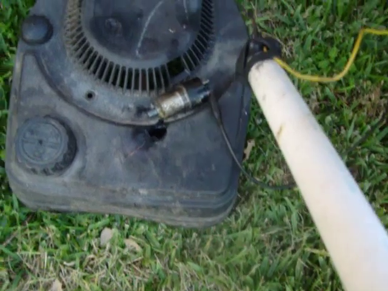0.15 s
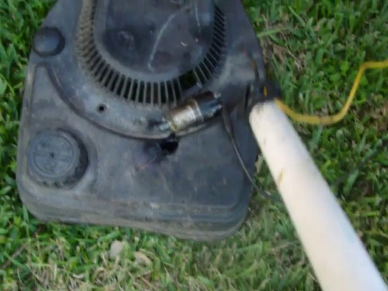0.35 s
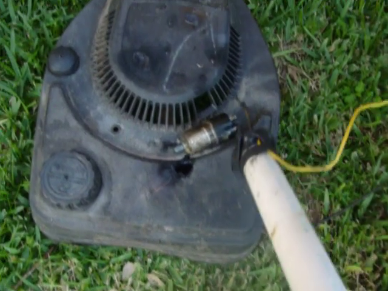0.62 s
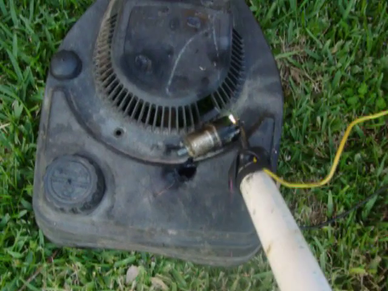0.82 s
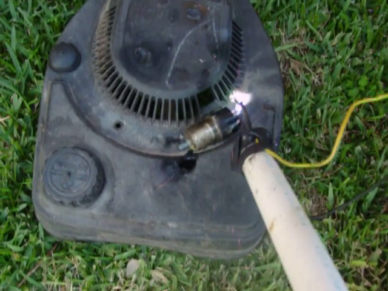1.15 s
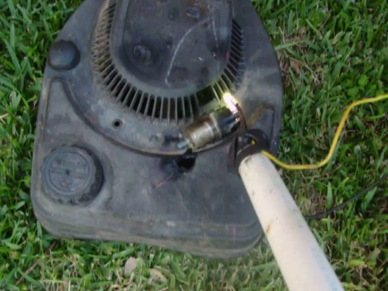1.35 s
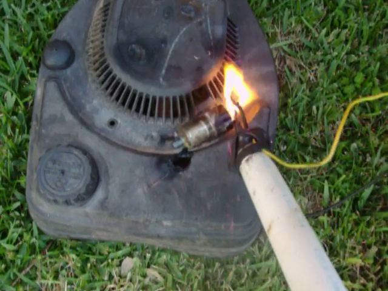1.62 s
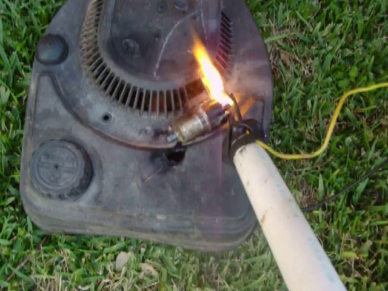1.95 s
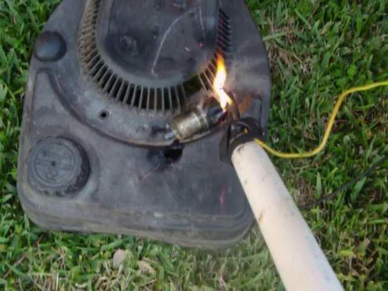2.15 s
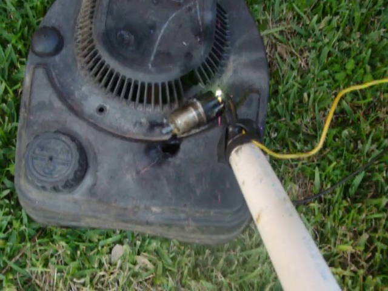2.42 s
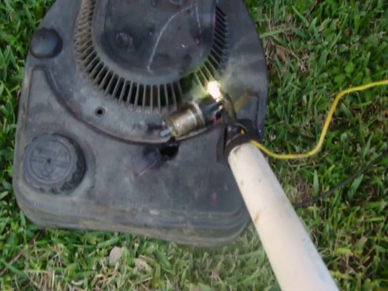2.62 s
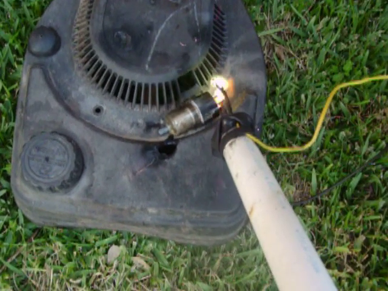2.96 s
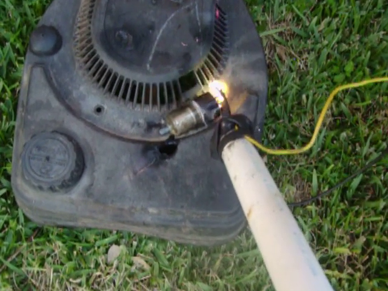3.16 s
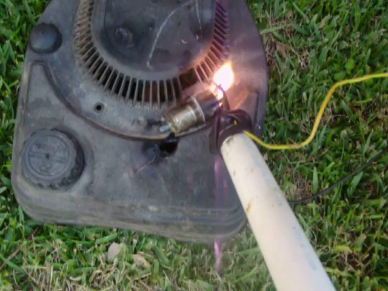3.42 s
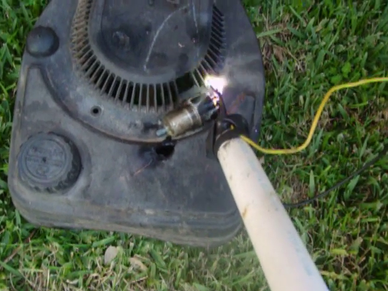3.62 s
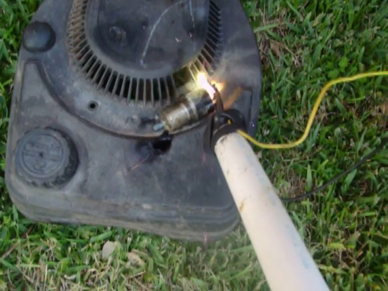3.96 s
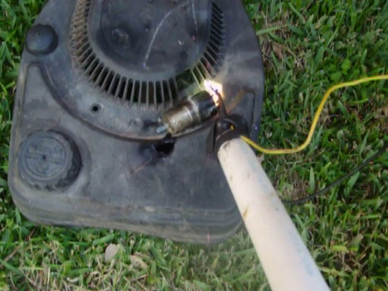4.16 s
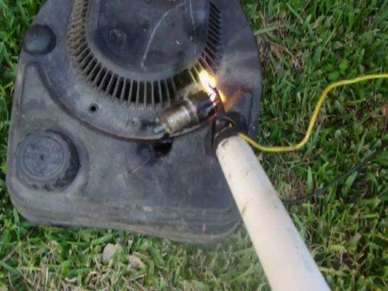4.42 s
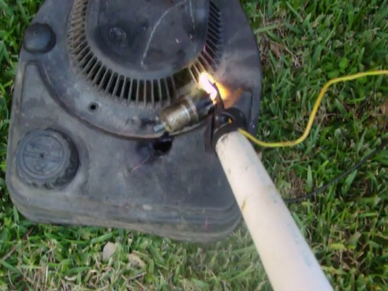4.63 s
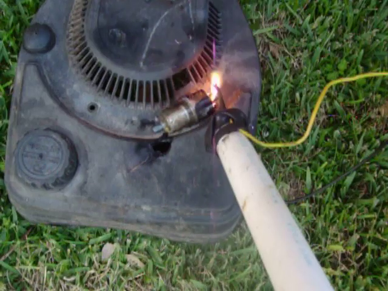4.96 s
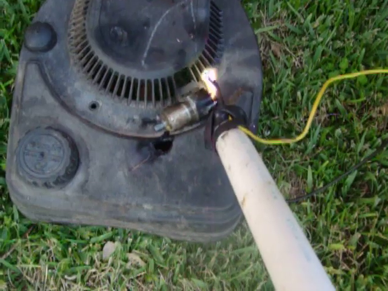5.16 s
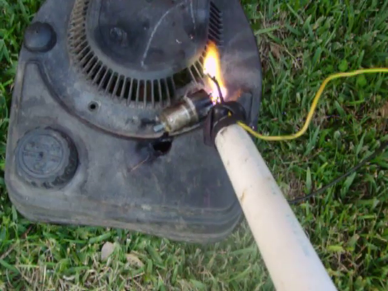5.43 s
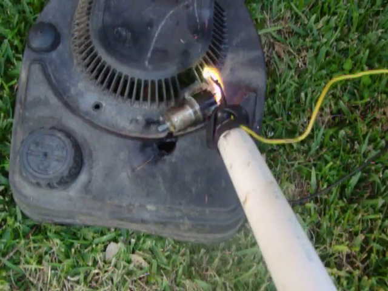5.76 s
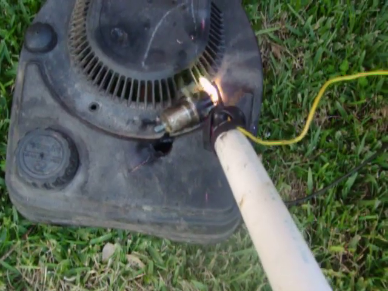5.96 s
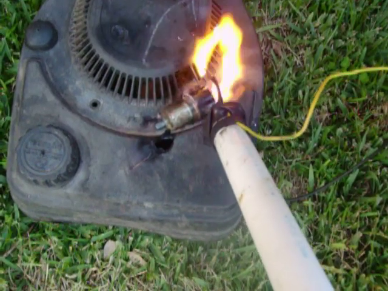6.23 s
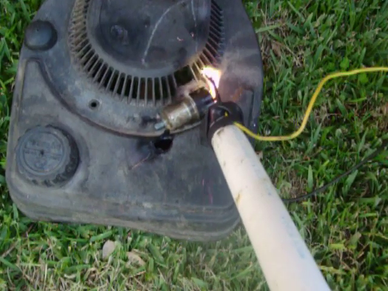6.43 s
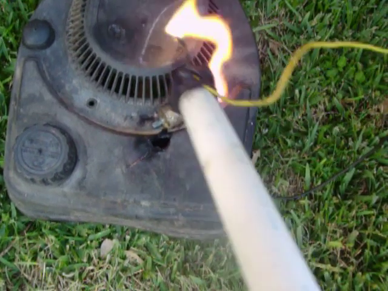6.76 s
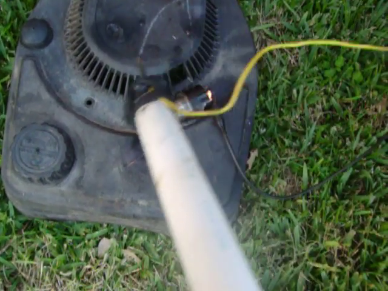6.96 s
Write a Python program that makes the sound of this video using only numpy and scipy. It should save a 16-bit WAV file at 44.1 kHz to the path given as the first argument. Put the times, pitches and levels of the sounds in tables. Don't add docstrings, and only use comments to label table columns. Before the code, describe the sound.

Outdoors over a lawn, motors drone with a wavering low transformer hum and a hollow, booming casing, swelling from 0 to 0.9 s. Near 0.9 s faint sparks tick and the background suddenly drops. At 1.1 s a mains-fed arc catches: a harsh, rasping buzz at about 120 strikes per second, each a dry crack plus a hollow thump ringing the housing. It flares unevenly, with heavy knocks around 1.6-2.3 s, weaker sputtering and soft gas swishes near 2.4-2.8 s, and brighter cracks to 3.6 s. From 3.9 to 5 s it is fuller, humming and densely crackling. Afterwards it tears and throbs, surging around 5.4, 6.2 and 6.3 s, with a tiny falling whistle at 6.54 s. It weakens and cuts out at 6.9 s; rumbling drone returns briefly. The close microphone clips, sounds muffled on top, and pumps.

```python
import sys
import numpy as np
from scipy import signal
from scipy.fft import rfft, irfft
from scipy.io import wavfile
from scipy.ndimage import uniform_filter1d, map_coordinates

SR = 44100
rng = np.random.default_rng(int(sys.argv[2]) if len(sys.argv) > 2 else 0)


def gain_from_db(level_db):
    decades = np.asarray(level_db, float) / 20
    return 10 ** decades


def master_out(mix):
    frames = np.transpose(np.atleast_2d(mix))
    ceiling = np.clip(frames, -1, 1)
    pcm = np.round(ceiling * 32767).astype(np.int16)
    wavfile.write(sys.argv[1], SR, pcm)


N = 312228
T = np.arange(N) / SR
COARSE = T[::32]

STRIKES_HZ, FIRST_STRIKE_S = 120.016, .0010
THUMP_MS, SHORT_CRACK_MS, LONG_CRACK_MS, SWITCH_S = .7, -1.55, .15, .04
LAG_MS_PER_DB, EARLY_SHARE = .03, .13
LIT_S, OUT_S = 1.132, 6.91
# centre_s, half_width_s, delay_ms
TUGS = [
    (1.87, .05, -1),
    (2.0, .1, 1.1),
    (3.98, .08, .5),
    (5.37, .06, .7),
    (5.54, .07, .8),
    (6.27, .08, .8),
    (6.53, .1, -.6),
    (6.65, .08, 1.2),
    (6.9, .14, 1.5),
]
# start_s, end_s
LONG_SPANS = [
    (1.88, 2.11),
    (2.24, 2.29),
    (3.47, 3.56),
    (3.87, 5.03),
    (5.24, 5.28),
    (5.35, 7.0),
]

# time_s, restrike_db, current_db
ARC = [(1.1, -31, -24.5), (1.4, -32, -24.5), (1.68, -31.5, -24), (2.0, -34, -27.5), (2.3, -34, -29),
       (2.47, -38, -28.5), (2.6, -32.5, -31.5), (3.0, -35, -37.5), (3.4, -30.5, -29), (3.8, -35.5, -35.5),
       (4.15, -28, -23.5), (4.4, -29.5, -26), (5.0, -29, -33), (5.2, -33.5, -43.5), (5.45, -29.5, -27.5),
       (5.9, -37, -37), (6.5, -29, -33), (6.7, -44.5, -31), (6.9, -43.5, -21)]
# peak_s, rise_s, fall_s, thump_db, brightness_db
SHORT_FLARES = [(1.17, 0.06, 0.051, -22.5, 7), (1.268, 0.02, 0.0041, -15, -19),
                (1.35, 0.029, 0.038, -17.5, -25), (1.47, 0.066, 0.16, -19, -19.5),
                (1.598, 0.12, 0.052, -26.5, -2.5), (1.674, 0.078, 0.016, -7, -22),
                (1.759, 0.036, 0.098, -22, -1.5), (2.342, 0.013, 0.007, -16, -5),
                (2.581, 0.089, 0.087, -29, -6.5), (2.729, 0.18, 0.0163, -24.5, 2.5),
                (2.878, 0.11, 0.013, -17, -9), (2.94, 0.054, 0.019, -17.5, -5.5),
                (3.05, 0.087, 0.022, -15, -18), (3.103, 0.017, 0.042, -21.5, 12),
                (3.181, 0.052, 0.031, -16.5, -10), (3.403, 0.13, 0.037, -11, -3),
                (3.49, 0.024, 0.15, -26, 13), (3.632, 0.053, 0.11, -18, -7), (3.77, 0.029, 0.03, -23.5, -8),
                (5.2, 0.13, 0.1, -17, -11), (5.345, 0.088, 0.04, -12.5, -1.5),
                (5.641, 0.095, 0.022, -24, -7), (5.73, 0.049, 0.087, -35.5, 18.5),
                (5.849, 0.081, 0.08, -18, -2.5)]
# peak_s, rise_s, fall_s, thump_db, brightness_db
LONG_FLARES = [(1.981, 0.047, 0.021, -16, 0.5), (2.089, 0.045, 0.039, -22.5, 13),
               (2.252, 0.073, 0.013, -9, -0.5), (3.879, 0.057, 0.08, -19.5, 7.5),
               (4.1, 0.38, 0.081, -22, -10), (4.23, 0.14, 0.039, -22, 9), (4.333, 0.039, 0.026, -21, -3.5),
               (4.408, 0.084, 0.031, -17.5, 5), (4.488, 0.025, 0.069, -17, 4),
               (4.602, 0.26, 0.12, -24.5, 2), (4.818, 0.11, 0.024, -18, 3), (4.901, 0.04, 0.009, -18, -3.5),
               (4.989, 0.025, 0.044, -27.5, 16.5), (5.42, 0.1, 0.028, -27.5, 17),
               (5.497, 0.036, 0.032, -25, 0), (5.562, 0.05, 0.015, -33, -8), (5.98, 0.11, 0.043, -28.5, 16),
               (6.109, 0.034, 0.076, -22, 11.5), (6.226, 0.022, 0.013, -13, 5),
               (6.31, 0.036, 0.014, -27, -11), (6.44, 0.073, 0.12, -30.5, 14),
               (6.522, 0.019, 0.012, -23, -1), (6.639, 0.088, 0.064, -21.5, 1.5),
               (6.85, 0.18, 0.061, -22, -15)]
EMBER_DB, EMBER_BRIGHT_DB = -37, 7.5
SLOPE_DB = 10
MID_DB, SIZZLE_SHARE, HUM_SHARE = -21, 0.22, 0.19
CUT_SHARE = 0.6
# centre_s, half_width_s, depth_db
LULLS = [(1.21, 0.02, 16), (1.43, 0.02, 14), (1.87, 0.043, 3), (2.43, 0.046, 4), (2.63, 0.016, 8),
         (2.78, 0.014, 13), (2.93, 0.025, 4), (3.08, 0.016, 4), (3.6, 0.048, 11), (3.83, 0.047, -4),
         (3.96, 0.064, 7.5), (4.76, 0.072, 12), (4.88, 0.017, 19), (5.511, 0.068, 19), (5.17, 0.057, 7),
         (5.61, 0.061, 6), (6.05, 0.026, -1), (6.29, 0.062, 6), (6.57, 0.022, 6)]

# mode_hz, width_hz, level_db
DULL_MODES = [
    (250, 52, -10),
    (618, 61, 0.5),
    (713, 140, 8.5),
]
# mode_hz, width_hz, level_db
BRIGHT_MODES = [
    (936, 120, 5),
    (1090, 160, 2.5),
    (1359, 49, 5),
    (1490, 110, -3),
]
DRIFT = .035
# delay_s, level_db
ECHOES = [
    (.002, -18.5),
    (.00335, -13),
    (.0063, -18),
]
DIRECT_DB = -9
# time_s, pitch_hz, level_db
POCKET = [(1.1, 645, -4), (1.13, 768, 0.5), (1.7, 666, -9), (1.73, 832, 2), (2.16, 714, -4),
          (3.46, 690, -6.5), (3.53, 823, -7.5), (3.62, 676, -1), (4.99, 780, -4), (5.2, 665, -7),
          (5.48, 866, -2.5), (5.53, 727, -1), (5.99, 713, -4.5), (6.02, 842, -5.5), (6.3, 713, -1.5),
          (6.52, 850, -1), (6.87, 642, -4), (6.95, 800, -2)]
POCKET_WIDTH_HZ = 140
# time_s, peak_db
BLOWS = [(1.583, -4), (1.667, -12), (1.676, -9), (1.741, -5), (1.941, -7), (1.958, -1), (2.05, -2.5),
         (2.092, -3), (2.133, -3), (2.2, -5.5), (2.251, -13), (2.259, -7), (2.309, -6.5), (2.867, -13),
         (3.385, -4.5), (3.393, -16), (3.401, -13), (3.592, -8), (4.216, -4), (4.308, 2), (4.317, 0.5),
         (4.358, 2), (4.417, 0), (4.466, 0), (4.493, -3), (4.583, -13), (4.849, -1), (4.858, -0.5),
         (4.975, -2), (5.049, -10), (5.333, -17), (5.342, -8), (5.351, -3), (5.567, -9), (5.601, -11.5),
         (5.684, -5.5), (5.774, -13), (6.074, -24), (6.166, -8.5), (6.192, 1.5), (6.2, -4), (6.225, -16),
         (6.275, -9), (6.308, -7), (6.341, -10), (6.626, -8), (6.643, -13), (6.676, -11), (6.751, -10),
         (6.768, -11), (6.826, -10)]

# frequency_hz, density_db (per Hz)
SNAP_COLOUR = [(300, -9), (1200, -2), (1900, -7), (2500, -2.5), (3300, 4), (4000, -3.5), (5300, -4.5),
               (6400, -13.5)]
# delay_s, level_db
SNAP_ECHOES = [
    (.00043, -13),
    (.0009, -9),
    (.00195, -11),
    (.0028, -16),
    (.0036, -17),
    (.0063, -20),
]
CRACK_EDGE, CRACK_T60_S = 13, .009
USUAL_TILT_DB, SPLIT_HZ = -5, 3900
# time_s, peak_db
TICKS = [
    (.899, -25),
    (.907, -23),
    (.9155, -26),
    (2.2597, -8),
    (4.8591, -8),
    (5.4255, -2),
    (6.2005, -2),
]
# time_s, peak_db, treble_over_mid_db
LOUD_CRACKS = [(1.1657, -10, 3), (1.1744, -14, -2), (1.2326, -19, -8), (1.2834, -11, -7.5),
               (1.3084, -7, -1.0), (1.4577, -7, 4), (1.5409, -14, 18), (1.5662, -9.5, 3),
               (1.6326, -21, 1), (1.6574, -8, 1), (1.6679, -10, -11), (1.674, -7, -4), (1.6846, -4.5, -5),
               (1.6916, -17, -3), (1.7661, -19, -9.5), (1.8417, -5, 0), (1.9433, -12, -5),
               (1.9674, -9, -4), (1.9764, -10, -7), (2.0277, -12, -6), (2.1008, -7, -16),
               (2.1086, -9, -20), (2.1174, -12, -19), (2.1589, -13, -8), (2.2597, -17, -9),
               (2.2837, -9, -17), (2.3153, -11, -7.0), (2.3494, -6, -6), (2.624, -18, -12),
               (2.6575, -14, 11), (2.6907, -12, 19), (2.7074, -11, 16), (2.7992, -22, 3),
               (2.8077, -7.5, 11), (2.8241, -14, 13), (2.883, -13, 7), (2.9496, -10, -11),
               (3.0076, -8.5, 10), (3.0494, -14, -6), (3.0576, -8, -2), (3.0661, -10, -2),
               (3.1094, -7, -7), (3.1741, -8, 14), (3.1909, -11, 13), (3.2171, -5, -5), (3.3075, -3, 11),
               (3.3159, -1.5, -1), (3.366, -5.5, 9), (3.3995, -30, -2), (3.4078, -9, -6),
               (3.4162, -25, -12), (3.4489, -15, 2), (3.5256, -12.5, -22), (3.542, -11.5, -17),
               (3.5487, -18, -6), (3.5822, -8.5, -7),
               (3.7071, -8.5, -14), (3.7239, -21, -8), (3.776, -13, 0), (3.8753, -5, 1), (3.9084, -5, -3),
               (3.9254, -6, -3), (4.009, -6.5, 3), (4.0248, -9, -7), (4.059, -7, -12), (4.0758, -13, -14),
               (4.109, -13, -6), (4.117, -12, 6), (4.143, -8, -5), (4.1501, -9, 6), (4.1752, -18, 2),
               (4.1906, -16, -3), (4.2, -8, 2), (4.2087, -15, 0), (4.242, -5, -11), (4.25, -7, -9),
               (4.2587, -19, -16), (4.3079, -7, -16), (4.342, -7, -11), (4.374, -7, -5), (4.4153, -11, -14),
               (4.4256, -7, -9.5), (4.432, -7, 5), (4.4654, -6, -9), (4.483, -11, 1.0), (4.4997, -10, -2.0),
               (4.534, -15, -9), (4.55, -13, 2), (4.5758, -21, -3), (4.5923, -23, -15), (4.6173, -14, -2.0),
               (4.626, -17, 7), (4.6336, -4, -1), (4.641, -16, -6.0), (4.667, -10, 3), (4.685, -13, -1.5),
               (4.6915, -7.5, -5), (4.7343, -6, -5.0), (4.741, -9, -5), (4.7922, -4, 0), (4.8, -5, -5),
               (4.808, -5, -2), (4.86, -12, -17.5), (4.8659, -9, -7), (4.901, -17, -25), (4.925, -13, -22),
               (4.9423, -8, -18), (4.9577, -12, -21), (4.992, -10, -21), (5.0005, -9, -15),
               (5.0491, -7, -2), (5.057, -10, -8),
               (5.1238, -11, -9), (5.1422, -11, -16), (5.1893, -15, -9), (5.2337, -14, -20),
               (5.2746, -19, -5), (5.3317, -20, -7.0), (5.3588, -3, -8.0), (5.3667, -11, 4),
               (5.3843, -10, 0), (5.3926, -15, -3), (5.4095, -16, -7), (5.4259, -4, -5), (5.443, -7, -5),
               (5.459, -3, -10), (5.4663, -7, -10), (5.4741, -3, -3), (5.541, -12, 1), (5.5765, -4.5, -4),
               (5.6416, -8.5, -5), (5.684, -9.5, -15), (5.715, -20, -12), (5.725, -15, -14),
               (5.767, -12.5, -13), (5.7744, -6, -10), (5.8168, -11, -2), (5.8249, -7, -9),
               (5.86, -9.5, -13), (5.875, -6, -10), (5.885, -8, 0), (5.8928, -5.5, -9), (5.909, -6, -6),
               (5.917, -5, -3), (5.9246, -14, 3), (5.96, -6, -1), (5.9662, -5, -11), (5.976, -10, -17),
               (5.992, -5, -9), (6.0338, -11, -11), (6.041, -8.5, -14), (6.0658, -7, -9.5),
               (6.0753, -5.5, -4), (6.116, -21, -1), (6.1424, -10, -14), (6.1588, -3, -7),
               (6.2004, -14, -6), (6.2345, -9, -15), (6.243, -10, -18), (6.317, -6.5, -3),
               (6.3493, -20.4, 5), (6.4502, -11, -18), (6.5003, -4.5, -7), (6.5173, -8, -9),
               (6.526, -7, -10), (6.539, -8, -4), (6.5917, -12.5, 0), (6.7093, -7.5, 1)]

# multiple (of the strike rate), level_db
HUM = [
    (1, -27),
    (2, 4.5),
    (3, -13.5),
]
# tear_s, rise_s, fall_s, throb_db, hum_db
THROB = [
    (6.316, 0.096, 0.0016, -21.5, -24.5),
    (6.705, 0.06, 0.0074, -25, -29),
    (6.87, 0.06, .03, -28, -33),
]
# peak_s, rise_s, fall_s, level_db
SWISH = [
    (2.6, 0.11, 0.04, -35.5),
    (2.72, 0.061, .08, -36),
]
CHIRP_S, CHIRP_HZ, CHIRP_FALL_HZ_PER_S, CHIRP_DB = 6.538, 2280, 30000, -31

# frequency_hz, density_db (per Hz)
ROAR = [(18, -48.5), (30, -27), (49, -39), (80, -15.5), (107, -9.5), (171, -5.5), (195, -7.5), (239, 5),
        (319, -7.5), (570, 0), (833, 0.5), (911, 0.5), (1820, -18.5), (5070, -25.5), (6200, -47.5),
        (8060, -74.5), (13600, -120)]
# mode_hz, width_hz, level_db
ROAR_PEAKS = [
    (272, 30, -17.5),
    (598, 81, 2),
    (883, 46, -2),
    (1384, 44, -7),
]
# turns_per_s, then rows of multiple, level_db
MOTORS = [
    (55.6, [(1, -9), (2, -2), (3, -5), (5, -6), (7, -11), (9, -7)]),
    (59.15, [(11, -5), (12, -10), (13, -6), (15, -7), (16, -6), (18, -12), (21, -8), (23, -13), (24, -13), (27, -15)]),
]
SAG_DB, ROAR_SAG_DB = -10, -3
# time_s, level_db
TRANSFORMER = [
    (0, -4),
    (.15, 11),
    (.3, 0.5),
    (.47, 5),
    (.6, -2.5),
    (.72, 7),
    (.87, -4.5),
    (1.0, -1),
    (7.08, -23),
]
TRANSFORMER_HZ = 240.0
# start_s, end_s, over_drone_db
IDLE = [
    (-.1, 0.88, 3),
    (0.875, 1.15, 7),
    (2.413, 2.653, 4.5),
    (6.915, 7.2, 4.5),
]
IDLE_HZ, IDLE_WIDTH_HZ, IDLE_EDGE_S = 304, 400, 0.038
BOOM_HZ, BOOM_WIDTH_HZ, BOOM_DB = 265, 35, -3

# time_s, cut_db, drone_db (climbed back to), recovery_s, fizz_db
CUTS = [(0, 15.5, -21.5, 0.44, -79), (0.877, 18.5, -28, 0.34, -21.5), (1.285, 15, -25, 0.56, -34),
        (1.691, 11, -29, 0.051, -24), (1.847, 14.5, -27, 0.13, -29), (2.286, 3.5, -32.5, 0.13, -51),
        (2.645, 4, -36, 0.028, -55), (2.883, 6, -32.5, 0.089, -34), (3.113, 11.5, -27.5, 0.097, -68.5),
        (3.418, 21.5, -32, 0.033, -27), (3.781, 13, -26.5, 0.27, -66), (4.497, 22.5, -30, 0.031, -30),
        (5.062, 9, -29.5, 0.13, -63), (5.581, 18, -31.5, 0.077, -34), (6.32, 14, -30, 0.13, -30),
        (6.54, 15, -28, 0.16, -24), (6.715, 12, -32, 0.13, -34), (6.901, 11.5, -30, 0.2, -78)]
SQUASH = .85
LIMIT, OFFSET, EDGE_HZ = .715, -.0033, 5720


def thump(level_db, bright_db):
    lag_s = LAG_MS_PER_DB * (level_db - MID_DB) / 1000
    clicks = strikes(column=1, jitter_s=.00007, spread_db=1.7, lag_s=lag_s)
    s, hz, db = np.transpose(POCKET)
    pocket_ring = ring(clicks, [(0.99, POCKET_WIDTH_HZ, 19)], np.interp(T, s, hz))
    pocket = gain_from_db(np.interp(T, s, db)) * evened(pocket_ring)
    dull = evened(ring(clicks, DULL_MODES, 1 + DRIFT * wander(7.7)))
    bright = evened(ring(clicks, BRIGHT_MODES, 1 + DRIFT * wander(17)))
    return gain_from_db(level_db - 4.0) * (dull + pocket + gain_from_db(bright_db - 4.0) * bright)


def blows():
    clicks = events([(moment(s + .0012, column=1) + 0.00036, db) for s, db in BLOWS], -12.0)
    return ring(clicks, DULL_MODES) + gain_from_db(9.5) * ring(clicks, BRIGHT_MODES)


def sizzle(level_db):
    clicks = gain_from_db(level_db - 0.5) * strikes(column=2, jitter_s=.00008, spread_db=1.54, early=EARLY_SHARE)
    rough = snaps(clicks, edge=CRACK_EDGE, t60=CRACK_T60_S)
    half_cycle = ((T + .003) * STRIKES_HZ).astype(int)
    sharp_db = 3.5 * np.clip(rng.standard_normal(half_cycle[-1] + 1), -2, 2)
    sharp = uniform_filter1d(gain_from_db(sharp_db)[half_cycle], 40)
    treble = signal.oaconvolve(rough, signal.firwin(31, SPLIT_HZ, pass_zero=False, fs=SR), "same")
    return (rough + (sharp - 1) * treble) * gain_from_db(2.0)


def cracks():
    rows = LOUD_CRACKS
    out = snaps(events(TICKS, -14.0), edge=8, t60=.008)
    for side in (-1, 1):
        tilted = [(s, db + side * (tilt_db - USUAL_TILT_DB) / 2) for s, db, tilt_db in rows]
        half = signal.firwin(31, SPLIT_HZ, pass_zero=side < 0, fs=SR)
        spikes = snaps(events(tilted, -18.5), edge=CRACK_EDGE, t60=CRACK_T60_S)
        out += signal.oaconvolve(spikes, half, "same")
    fizz = events([(row[0] - .003, row[-1]) for row in CUTS[1:]], 2.2)
    return out + snaps(fizz, edge=0, t60=0.033)


def hum(level_db):
    late_s = np.interp(T, COARSE, delay(COARSE, column=1))
    angle = 2 * np.pi * STRIKES_HZ * (T - late_s + THUMP_MS / 1000)
    orders = sum(gain_from_db(db) * np.cos(k * angle + phase) for (k, db), phase in zip(HUM, (2.4, .9, .9)))
    throb_db, swell_db = swells(THROB)
    return (gain_from_db(level_db - 1.5) + gain_from_db(swell_db)) * orders + gain_from_db(throb_db - 3.0) * np.cos(angle + 1.8)


def flame(level_db):
    return gain_from_db(level_db - 28.5) * evened(resonate(rng.standard_normal(N), 120, 70))


def hiss():
    gas = evened(signal.oaconvolve(rng.standard_normal(N), colour(SNAP_COLOUR), "same"))
    t = np.clip(T - CHIRP_S, 0, .018)
    envelope = np.sin(np.pi * (t / .018) ** .5)
    whistle = np.sin(2 * np.pi * (CHIRP_HZ - CHIRP_FALL_HZ_PER_S * t / 2) * t) * envelope
    return gain_from_db(swells(SWISH)[0]) * gas + gain_from_db(CHIRP_DB) * whistle


def flares():
    rows = [(s, rise, fall, db, db + bright_db)
            for s, rise, fall, db, bright_db in SHORT_FLARES + LONG_FLARES]
    low_db, high_db = swells(rows)
    low = np.hypot(gain_from_db(low_db), gain_from_db(EMBER_DB))
    high = np.hypot(gain_from_db(high_db), gain_from_db(EMBER_DB + EMBER_BRIGHT_DB))
    return 20 * np.log10(low), 20 * np.log10(high / low)


def strikes(column, jitter_s, spread_db, lag_s=0, early=0):
    count = int(N / SR * STRIKES_HZ) - 2
    late, size = rng.standard_normal((count, 2)).T
    zero = FIRST_STRIKE_S + np.arange(1, count + 1) / STRIKES_HZ
    at = np.where(rng.random(count) < early, zero + SHORT_CRACK_MS / 1000, moment(zero, column))
    at += jitter_s * late + np.interp(zero, T, lag_s + 0 * T)
    return np.bincount((at * SR).astype(int), gain_from_db(spread_db * np.clip(size, -2, 2)), N)


def moment(s, column):
    zero = FIRST_STRIKE_S + np.round((s - FIRST_STRIKE_S) * STRIKES_HZ) / STRIKES_HZ
    return zero + delay(zero, column)


def delay(s, column):
    long = sum(np.clip(np.minimum(s - a, b - s) / SWITCH_S + .5, 0, 1) for a, b in LONG_SPANS)
    crack_ms = SHORT_CRACK_MS + (LONG_CRACK_MS - SHORT_CRACK_MS) * long
    return (bumps(TUGS, s) + (THUMP_MS if column == 1 else crack_ms)) / 1000


def events(rows, db):
    s, peak_db = np.transpose(rows)
    return np.bincount((s * SR).astype(int), gain_from_db(peak_db + db), N)


def ring(clicks, modes, shift=1):
    push = signal.oaconvolve(clicks, signal.windows.hann(round(.0009 * SR)))[round(.0004 * SR):][:N]
    pulses = -signal.lfilter(*signal.butter(1, 150, "high", fs=SR), push)
    rung = sum(gain_from_db(db) * resonate(pulses, f * shift, w) for f, w, db in modes)
    return echoed(gain_from_db(DIRECT_DB) * pulses + rung, ECHOES)


def snaps(clicks, edge, t60):
    sparks = signal.oaconvolve(clicks, gain_from_db(-60 * T[:3000] / t60))[:N] * rng.standard_normal(N)
    return echoed(signal.oaconvolve(sparks - edge * clicks, colour(SNAP_COLOUR), "same"), SNAP_ECHOES)


def echoed(x, echoes):
    out = x.copy()
    for s, db in echoes:
        lag = round(s * SR)
        out[lag:] += gain_from_db(db) * x[:N - lag]
    return out


def resonate(x, hz, width):
    turn = np.exp(2j * np.pi * np.cumsum(hz + 0 * x) / SR)
    r = np.exp(-np.pi * width / SR)
    return 2 * (turn * signal.lfilter([1 - r], [1, -r], x / turn)).real


def colour(points):
    gain = gain_at(points, np.fft.rfftfreq(1024, 1 / SR))
    cepstrum = irfft(np.log(np.maximum(gain, gain_from_db(-32))))
    folded = cepstrum * np.r_[1, 2 * np.ones(511), 1, np.zeros(511)]
    spike = np.roll(irfft(np.exp(rfft(folded))), 125)[:257]
    return evened(spike * signal.windows.hann(257)) / 16


def gain_at(points, hz):
    f, db = np.transpose(points)
    return gain_from_db(np.interp(np.log(hz + 1), np.log(f + 1), db, -90, -90))


def swells(rows):
    s, rise, fall, *levels = np.transpose(rows)[:, :, None]
    shape_db = -SLOPE_DB * np.maximum((s - COARSE) / rise, (COARSE - s) / fall)
    powers = [(gain_from_db(db + shape_db) ** 2).sum(0) for db in levels]
    return [np.interp(T, COARSE, 10 * np.log10(power + 1e-12)) for power in powers]


def bumps(rows, s):
    return sum(height * np.maximum(1 - abs(s - at) / width, 0) for at, width, height in rows)


def wander(hz):
    knots = rng.standard_normal(400)
    return evened(map_coordinates(knots, [T * hz], order=3, mode="wrap"))


def evened(x):
    return x / np.sqrt(np.mean(x ** 2) + 1e-20)


def drone():
    hz = np.fft.rfftfreq(N, 1 / SR)
    roar = evened(irfft(rfft(rng.standard_normal(N)) * gain_at(ROAR, hz), N))
    white = rng.standard_normal(N)
    casing = sum(gain_from_db(db) * evened(resonate(white, f, w)) for f, w, db in ROAR_PEAKS)
    out = gain_from_db(6.5 + 0.7 * wander(30)) * roar + casing
    out *= gain_from_db(ROAR_SAG_DB * (T > LIT_S) * (T < OUT_S))
    loaded = T > CUTS[1][0]
    for (turns, orders), sag_db in zip(MOTORS, (SAG_DB, SAG_DB / 2)):
        angle = 2 * np.pi * np.cumsum(turns * (1 + 0.00154 * wander(4))) / SR
        for k, db in orders:
            level_db = db + 4.0 + 0.34 * wander(20) + sag_db * loaded
            out += gain_from_db(level_db) * np.sin(k * angle + 2 * np.pi * rng.random())
    transformer = np.sin(2 * np.pi * TRANSFORMER_HZ * T)
    return out + gain_from_db(np.interp(T, *np.transpose(TRANSFORMER))) * transformer


def idle():
    level = sum(gain_from_db(db) * np.clip(np.minimum(COARSE - a, b - COARSE) / IDLE_EDGE_S + .5, 0, 1)
                for a, b, db in IDLE)
    white = rng.standard_normal(N)
    once = resonate(white, IDLE_HZ, IDLE_WIDTH_HZ)
    rattle = evened(resonate(once, IDLE_HZ, IDLE_WIDTH_HZ))
    boom = gain_from_db(BOOM_DB) * evened(resonate(white, BOOM_HZ, BOOM_WIDTH_HZ)) * (T < CUTS[1][0])
    return np.interp(T, COARSE, level) * gain_from_db(1.3 * wander(25)) * rattle + boom


def automatic_gain():
    s, cut_db, top_db, recover_s, _ = np.transpose(CUTS)
    last = np.maximum(np.searchsorted(s, T, "right") - 1, 0)
    since = (T - s[last]) / recover_s[last]
    dip_db = -cut_db[last] * np.where(last > 0, np.exp(-since), np.maximum(1 - since, 0))
    return top_db[last] + dip_db, dip_db


def scene():
    drone_db, dip_db = automatic_gain()
    thump_db, bright_db = flares()
    s, strike_db, current_db = np.transpose(ARC)
    sizzle_db = np.interp(T, s, strike_db) + SIZZLE_SHARE * (thump_db - MID_DB) + CUT_SHARE * dip_db
    sizzle_db -= np.interp(T, COARSE, bumps(LULLS, COARSE))
    hum_db = np.interp(T, s, current_db) + HUM_SHARE * (thump_db - MID_DB) + dip_db
    burning = np.interp(T, [LIT_S - .03, LIT_S, OUT_S, OUT_S + 0.013], [0, 1, 1, 0])
    steady = thump(thump_db + CUT_SHARE * dip_db, bright_db) + sizzle(sizzle_db) + hum(hum_db) + flame(hum_db)
    arc = burning * steady + blows() + hiss()
    gain = gain_from_db(drone_db)
    settle = signal.lfilter([1, -1], [1, -.998], gain - gain[0])
    slow = arc + gain * (drone() + idle()) + .5 * settle
    squashed = slow / (1 + (slow / SQUASH) ** 6) ** (1 / 6)
    return (squashed + cracks())[None]


def top_cut(x):
    return signal.sosfilt(signal.butter(12, 15830, fs=SR, output="sos"), x)


def record(dry):
    low_pass = signal.firwin(161, EDGE_HZ, window=("kaiser", 5), fs=SR)
    narrow = signal.oaconvolve(dry, low_pass[None], "same")
    limited = np.clip(narrow, -LIMIT, LIMIT) + OFFSET
    return top_cut(limited)


dry = scene()
out = record(dry)
master_out(out)
```